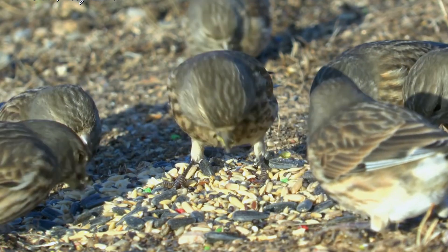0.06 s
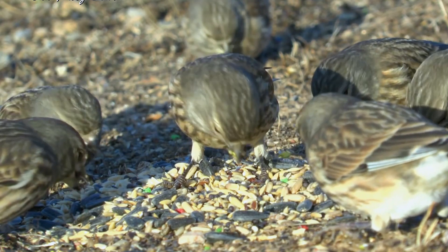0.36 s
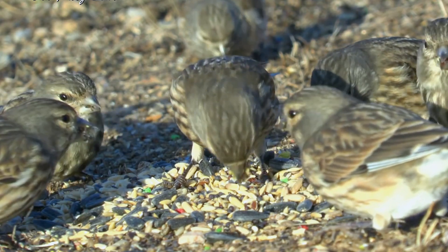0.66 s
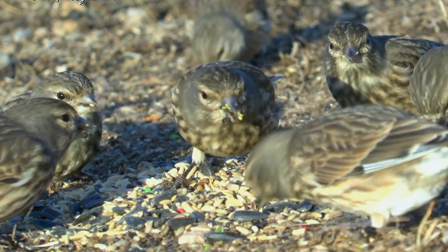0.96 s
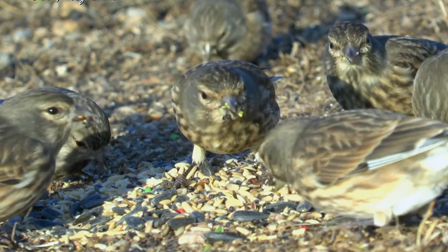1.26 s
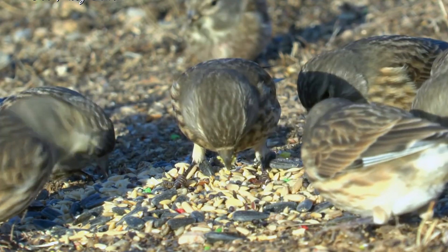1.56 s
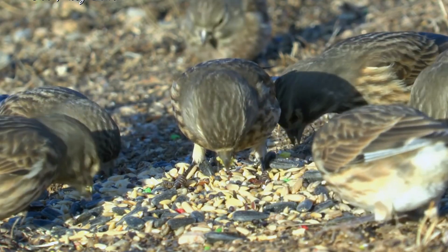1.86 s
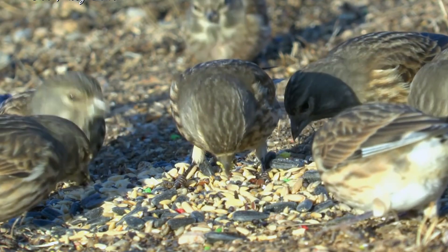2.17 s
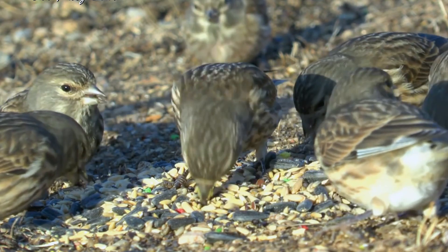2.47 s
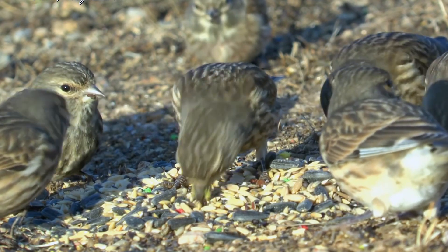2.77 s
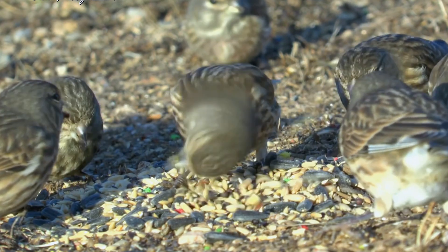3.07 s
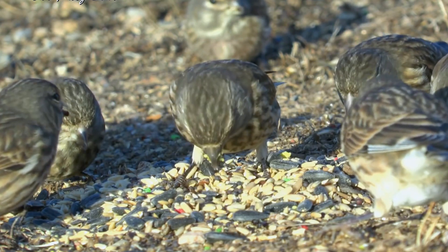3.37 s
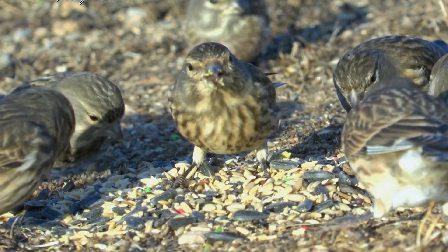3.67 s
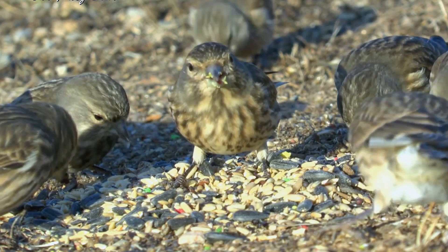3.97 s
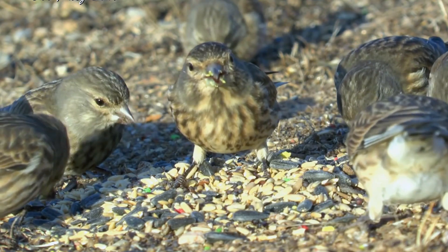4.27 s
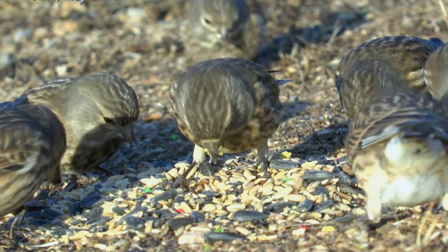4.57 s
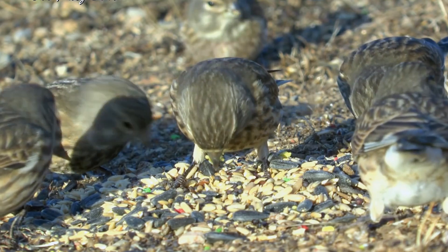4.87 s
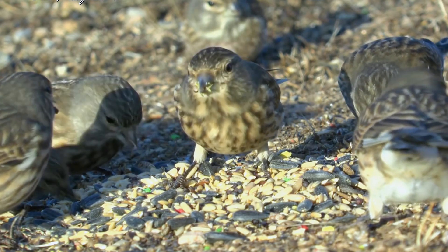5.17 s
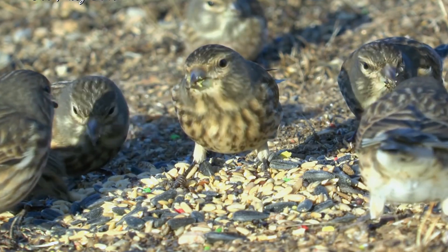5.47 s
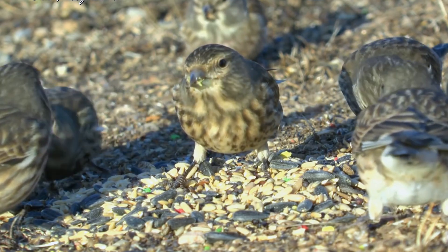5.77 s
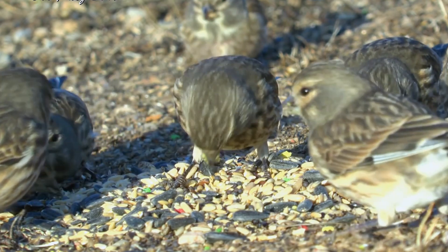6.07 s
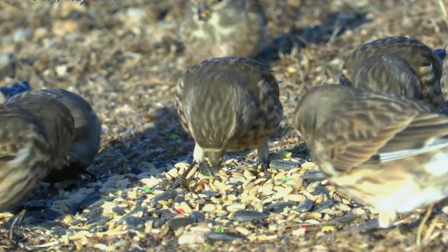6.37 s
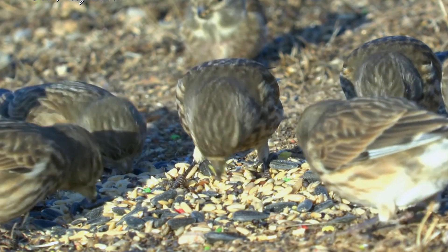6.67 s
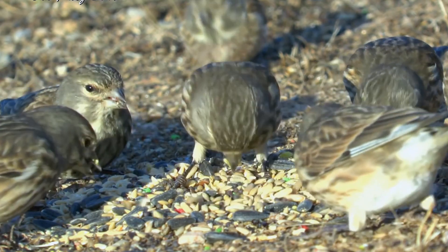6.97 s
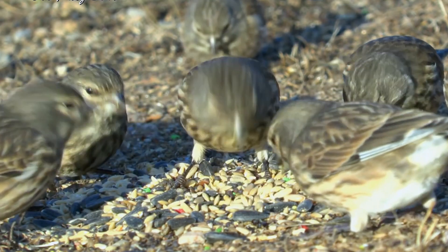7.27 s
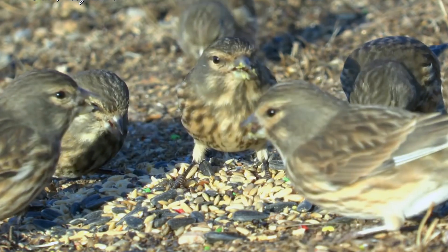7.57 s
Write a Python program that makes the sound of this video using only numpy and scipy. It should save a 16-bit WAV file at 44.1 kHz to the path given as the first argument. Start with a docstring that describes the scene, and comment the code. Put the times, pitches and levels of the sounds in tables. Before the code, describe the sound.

A flock of small finches feeds on seed close to the microphone outdoors. Sharp, falling chips come in quick groups, mixed with tiny pecking ticks, cracking husks and a few faint low bumps. Later the birds bicker in a run of hoarse, wavering calls that ends in one brief harsh squabble. Farther birds whistle thinly and give a buzzy chatter at the end, over a soft rush and faint hum.

```python
"""Over a low outdoor rush and a faint hum, husks crack and sharp chips fall in pitch: small finches feed
close by, then bicker in wavering calls and one harsh squabble. Each voice is a gliding tone of the syrinx,
roughened by membrane flutter and coloured by throat or beak; each husk is an impulse with one resonance.
Birds further off whistle and chatter, and a hard surface nearby throws back a quick echo."""
import sys
import numpy as np
from scipy import signal
from scipy.fft import rfft, irfft, next_fast_len
from scipy.io import wavfile
from scipy.ndimage import map_coordinates

SR = 44100
rng = np.random.default_rng(int(sys.argv[2]) if len(sys.argv) > 2 else 0)


def dump(signal):
    """Clip the signal to [-1, 1] and save it as 16-bit WAV at the path in sys.argv[1]."""
    limited = np.clip(np.atleast_2d(signal).T, -1, 1)
    pcm = np.round(limited * 32767).astype(np.int16)
    wavfile.write(sys.argv[1], SR, pcm)


N = 340011


def amp(db):
    """Decibels as an amplitude ratio."""
    return 10 ** (np.asarray(db) / 20)


def unit(x):
    """Normalisation to rms 1."""
    return x / np.sqrt(np.mean(x ** 2) + 1e-20)


def along(points, hz):
    """Interpolation of (frequency_hz, value) points on a logarithmic frequency axis."""
    f, v = np.transpose(points)
    return np.interp(np.log(hz + 1), np.log(f + 1), v)


def filtered(x, response):
    """Linear filtering: the spectrum is multiplied by a frequency response."""
    size = x.shape[-1]
    m = next_fast_len(size + 4096)
    return irfft(rfft(x, m) * response(np.fft.rfftfreq(m, 1 / SR)), m)[..., :size]


def noise(spectrum, size):
    """Spectral shaping of white noise, at rms 1."""
    return unit(filtered(rng.standard_normal(size), lambda hz: amp(along(spectrum, hz))))


def wobble(rate, size):
    """Random modulation: a smooth curve with rate knots a second."""
    return map_coordinates(rng.standard_normal(2048), [np.arange(size) * rate / SR], mode="wrap")


def phase_of(hz):
    """Phase is the time integral of frequency."""
    return 2 * np.pi * np.cumsum(hz) / SR


def progress(length_s):
    """Normalised time, 0 to 1 over a note."""
    return np.linspace(0, 1, max(int(length_s * SR), 8))


def add(track, start_s, sound):
    """Superposition of a sound on a track."""
    part = track[max(round(start_s * SR), 0):][:len(sound)]
    part += sound[:len(part)]


def background():
    """Low rush, thin hiss and a slightly unsteady hum, highly coherent between the ears."""
    # spectrum of the outdoor rush: frequency_hz, relative_density_db
    rush_spectrum = [(15, -62), (25, -22), (109, -8), (140, -6.5), (173, -1), (395, -8), (507, -14.5),
                     (541, -9), (578, -8.5), (649, -16), (717, -10), (846, -14), (1030, -38.5), (1080, -24),
                     (1300, -22), (1690, -57.5), (2860, -120)]
    # spectrum of the hiss: frequency_hz, relative_density_db
    hiss_spectrum = [(650, -32), (1100, -1.5), (1150, -17), (1380, -6), (1560, -6), (1810, -4),
                     (4530, -9.5), (7800, -11), (9900, -6), (15600, -9.5), (16100, -23.5)]
    # partials of the hum: frequency_hz, level_db
    partials = [(546.6, -66), (1093, -83), (1420, -80.5)]
    rush_gain = amp(-60.5 + 1.9 * wobble(4.3, N))
    rush = rush_gain * filtered(noise(rush_spectrum, N), lambda hz: hz / np.hypot(hz, 55))
    hiss = amp(-66.5) * noise(hiss_spectrum, N)
    hum = np.zeros(N)
    for hz, db in partials:
        peak = np.sqrt(2) * amp(db + wobble(4.7, N))
        hum += peak * np.sin(phase_of(hz * (1 + .0016 * wobble(5.5, N))))
    side = amp(-79.5) * noise(rush_spectrum, N) + amp(-99.5) * noise(hiss_spectrum, N)
    return rush + hiss + hum + np.array([side, -side])


def thumps():
    """Dull bumps under some loud notes: a smooth 30 ms pulse holds only low frequencies."""
    # bumps: centre_s, peak_db
    bumps = [(1.605, -46), (1.745, -52), (1.922, -45), (4.588, -54), (4.694, -63)]
    out, u = np.zeros(N), progress(.03)
    for centre_s, db in bumps:
        add(out, centre_s - len(u) / SR / 2, amp(db) * np.sin(np.pi * u) ** 4)
    return out


def yard(x, echo_db, tail_db, t60_s):
    """Comb filtering by one inverted reflection, stronger on the left, then a weak diffuse decay."""
    # grit and twigs scatter treble best: frequency_hz, gain_db
    scatter = [(2000, -3.5), (4000, -4), (8000, 3.5), (14000, 6)]
    delay_s, ear_gains = .0026, np.array([[1.4], [.6]])
    near = filtered(x, lambda hz: 1 - ear_gains * amp(echo_db) * np.exp(-2j * np.pi * hz * delay_s))
    t = np.arange(SR // 2) / SR
    tail = rng.standard_normal((2, len(t))) * amp(-60 * t / t60_s)
    tail = filtered(tail / np.linalg.norm(tail[0]), lambda hz: amp(along(scatter, hz)))
    mid, side = amp(tail_db) * signal.fftconvolve(x[None], tail, axes=1)[:, :N]
    return near + np.array([mid + side / 2, mid - side / 2])


def chatter(start_s=7.056, period_s=.0745, syllable_s=.033, count=9):
    """A far bird's buzzy run: nearly periodic bursts of band noise, growing a little louder."""
    out, u = np.zeros(N), progress(syllable_s)
    for k, db in enumerate(np.linspace(-66, -62, count)):
        syllable = np.sin(np.pi * u) * noise([(2500, -24), (3800, -11), (5200, -4), (6800, -27)], len(u))
        onset_s = start_s + k * period_s + rng.normal(0, .0061)
        add(out, onset_s, amp(db + rng.normal(0, .994)) * syllable)
    return out


def tremble(size, depth, rate_hz=125):
    """Frequency modulation: a quick, uneven shake, as a factor on pitch."""
    return 1 + depth * np.sin(phase_of(rate_hz * (1 + .2 * wobble(60, size))) + 2 * np.pi * rng.random())


def syrinx(hz, rasp, waver, jitter, shiver):
    """A wavering tone and its overtones; membrane flutter gives each sidebands, heard as rasp."""
    size = len(hz)
    shaken_hz = hz * tremble(size, shiver)
    phase = phase_of(shaken_hz * (1 + waver * wobble(260, size) + jitter * rasp * wobble(1500, size)))
    buzz = np.exp(-1j * phase_of(1000 + 300 * wobble(200, size)))  # an unsteady second oscillation
    shake = .43 * (wobble(2800, size) + 1j * wobble(2800, size)) + .35 * (buzz + buzz.conj() / 2)
    flutter = (1 + rasp * amp(2.8 * wobble(96, size)) * shake) / np.sqrt(1 + rasp ** 2)
    overtones = sum(amp(db) * np.exp(1j * k * phase) for k, db in enumerate([0, -4, -11], 2))
    return unit((flutter * np.exp(1j * phase)).imag), unit((flutter ** 2 * overtones).imag)


def whistles(overtone_db=-25):
    """Far, slightly hoarse glides, thin because nearly all their energy lies in the fundamental."""
    # slurred notes: start_s, length_s, start_hz, end_hz, level_db
    notes = [(1.38, .045, 3900, 4460, -58), (1.794, 0.0145, 3150, 3350, -50),
             (2.418, .045, 4270, 3844, -57), (3.09, .052, 3540, 4380, -39),
             (3.348, 0.057, 4280, 4400, -51.5), (3.482, 0.041, 5660, 5040, -51.5),
             (3.621, 0.056, 5500, 5040, -45.5), (4.754, 0.027, 3240, 3620, -49),
             (4.84, 0.13, 6010, 6170, -64), (6.059, 0.035, 3080, 3720, -47.5),
             (6.144, 0.028, 3860, 5100, -45), (6.255, 0.052, 2800, 3030, -43),
             (6.253, 0.024, 3320, 5030, -45), (6.271, 0.024, 4125, 5750, -42.5),
             (6.593, 0.026, 5470, 5130, -46.5)]
    out = np.zeros(N)
    for start_s, length_s, start_hz, end_hz, db in notes:
        u = progress(length_s)
        hz = end_hz + (start_hz - end_hz) * (1 - u) ** 2
        tone, overtones = syrinx(hz, rasp=.2, waver=.01, jitter=.02, shiver=0)
        add(out, start_s, amp(db) * np.sin(np.pi * u) * (tone + amp(overtone_db) * overtones))
    return out


def crack(db, pitch_hz, half_width_hz=1700, click_db=-19.5):
    """Impulse excitation: a snap and faint crumbling drive one broad resonance over a wideband click."""
    t = np.arange(-64, 1024) / SR
    decay = (t >= 0) * (amp(-60 * t / .002) + amp(-22 - 60 * t / .055))
    snap = decay * rng.standard_normal(len(t))
    resonance = lambda hz: 1 / (1 + ((hz - pitch_hz) / half_width_hz) ** 2)
    response = lambda hz: (resonance(hz) + amp(click_db)) * amp(along([(1100, -31.5), (2600, 0)], hz))
    return 22 * amp(db) * filtered(snap / np.linalg.norm(snap), response)


def husks(faintest_db=-68.5, spread_db=13.5, highest_hz=14000):
    """Fracture transients: husks snap in beaks among tiny random ticks of pecking, most of them high."""
    # cracking husks: start_s, level_db, pitch_hz
    snaps = [(.191, -41.5, 13800), (.697, -24.5, 11100), (1.416, -38, 2780), (1.529, -37, 8800),
             (1.569, -34.5, 15000), (1.687, -22.5, 15100), (1.909, -17.5, 13950), (2.003, -39.5, 15000),
             (2.127, -42, 12700), (2.448, -40.5, 13100), (2.823, -36, 13500), (.886, -48.5, 7170),
             (2.879, -35, 10900), (3.571, -42, 10600), (3.597, -36, 8900), (3.627, -39.5, 5000),
             (4.22, -39, 11000), (4.322, -29, 4000), (4.609, -37.5, 4860), (4.719, -31, 4960),
             (5.519, -28.5, 12500), (5.958, -34, 6000), (6.375, -38.5, 13000), (7.329, -43, 8500)]
    pecks = [(when * N / SR, faintest_db + spread_db * size ** 2, highest_hz * pitch ** .35)
             for when, size, pitch in rng.random((170, 3))]
    out = np.zeros(N)
    for start_s, db, pitch_hz in list(snaps) + pecks:
        add(out, start_s - 64 / SR, crack(db, pitch_hz))  # a crack has 64 samples of lead-in
    return out


def airy(voices, db, t60_s):
    """Amplitude-modulated noise: a soft hiss follows the power of each note and dies just after it."""
    fade = amp(-60 * np.arange(SR // 4) / SR / t60_s) ** 2
    power = np.abs(signal.fftconvolve(voices ** 2, fade / fade.sum())[:N])
    hiss = noise([(1200, -29), (1800, 7.5), (4500, 0), (7000, -3.5), (10000, -8.5), (15000, -3.5)], N)
    return amp(db) * np.sqrt(power) * hiss


def squabble(start_s=6.35, length_s=.2194, low_trim_db=1.5, high_trim_db=-2.5, harsh_db=6):
    """Biphonation: in a harsh threat, both sides of the syrinx sound at once on different pitches."""
    # course of the two voices: time_s, low_db, high_db, overtone_db, low_hz, high_hz
    course = [(6.36, -42, -39, -38.5, 2490, 3410), (6.388, -36.5, -28, -35, 2398, 3570),
              (6.432, -28, -36.5, -30, 2646, 3400), (6.457, -28, -26.5, -30, 2565, 3295),
              (6.503, -35.5, -28.5, -43.5, 2380, 3300), (6.522, -28.5, -34, -46, 2100, 3080),
              (6.539, -33, -23.5, -43, 2350, 3320), (6.56, -32, -41, -54, 2210, 3500)]
    t = start_s + length_s * progress(length_s)
    times, *columns = np.transpose(course)
    low_db, high_db, overtone_db, low_hz, high_hz = [np.interp(t, times, column) for column in columns]
    low, low_overtones = syrinx(low_hz, rasp=.3, waver=.04, jitter=.11, shiver=.025)
    high, high_overtones = syrinx(high_hz, rasp=.4, waver=.036, jitter=.05, shiver=.025)
    sway_db = 2 * wobble(88.7, len(t))  # one side gains as the other weakens
    voice = amp(low_trim_db + low_db + sway_db) * low + amp(high_trim_db + high_db - sway_db) * high
    voice += amp(harsh_db + overtone_db) * unit(high_overtones + .3 * low_overtones)
    out = np.zeros(N)
    add(out, start_s, voice * amp(1.3 * wobble(153.2, len(t))) * signal.windows.tukey(len(t), .1))
    return out


def flanks(u, peak):
    """Normalised distance before and after a note's turning point, each 0-1."""
    peak = np.clip(peak, .02, .95)
    return np.clip(1 - u / peak, 0, 1), np.clip((u - peak) / (1 - peak), 0, 1)


def arch(u, start_hz, crest_hz, end_hz, crest, sag):
    """Pitch contour: a glide to the crest, then a fall that comes earlier with more sag."""
    before, after = flanks(u, crest)
    fall = (1 - after ** 1.2) ** sag
    return end_hz + (crest_hz - end_hz) * fall + (start_hz - crest_hz) * before ** 1.7


def swell(u, loudest, rise_db, fall_db, bend):
    """Amplitude envelope: air pressure rises and falls through one note, with soft ends."""
    before, after = flanks(u, loudest)
    return amp(-rise_db * before ** bend - fall_db * after ** bend) * signal.windows.tukey(len(u), .14)


def calls(attack_s=.0023, full_voice_db=-15.5, overtone_growth=.58):
    """Arching notes that start hoarse and clear; harmonics grow nonlinearly, so louder is brighter."""
    # wavering calls: start_s, length_s, start_hz, crest_hz, end_hz, crest_fraction, loudest_fraction,
    # sag_exponent, level_db, rasp_depth, shiver_depth
    notes = [(3.307, 0.075, 4054, 3768, 2338, .3, 0.68, 1.1, -28.5, 0.63, 0.0069),
             (5.178, 0.073, 2067, 3590, 2970, .36, 0.64, 2.2, -34.5, 0.42, .025),
             (5.327, 0.068, 3054, 3630, 3003, 0.5, 0.84, 1.2, -40, 0.19, 0.014),
             (5.506, 0.084, 3740, 3905, 2358, 0.3, 0.49, 3.3, -18.5, 0.18, 0.016),
             (5.636, 0.087, 3550, 3530, 2934, .28, 0.45, 2.6, -21, 0.41, .01),
             (5.757, 0.085, 3350, 3588, 2973, .39, 0.62, 4.5, -18.5, 0.29, .035),
             (5.891, 0.092, 3480, 3618, 2527, .27, .72, 1.1, -17.5, 0.5, 0.017),
             (6.126, 0.066, 3083, 3446, 2870, 0.1, 0.54, 1.3, -37.5, 0.22, .03),
             (6.286, 0.079, 3123, 3620, 2650, .33, .5, 2.1, -15.5, .3, 0.017),
             (6.633, 0.097, 2095, 3390, 2667, 0.6, 0.9, 1.9, -27.5, 0.67, 0.047)]
    out = np.zeros(N)
    for start_s, length_s, start_hz, crest_hz, end_hz, crest, loudest, sag, db, rasp, shiver in notes:
        u = progress(length_s)
        hz = arch(u, start_hz, crest_hz, end_hz, crest, sag)
        tone, overtones = syrinx(hz, rasp * (1.5 - 1.2 * u), waver=.016, jitter=.04, shiver=shiver)
        push = swell(u, loudest, rise_db=15, fall_db=12.5, bend=1.15) * amp(wobble(150, len(u)))
        strain = swell(u, (crest + loudest) / 2, rise_db=24, fall_db=34, bend=1.9)
        overtone_db = -10 + overtone_growth * (db - full_voice_db)
        onset = 1 - np.exp(-u * length_s / attack_s)
        add(out, start_s, amp(db) * onset * (push * tone + amp(overtone_db) * strain * overtones))
    return out


def throat(source):
    """Source and filter: the throat's resonances colour the sound of the syrinx."""
    # response of the throat: frequency_hz, gain_db
    formants = [(1100, -22.5), (1600, -11.5), (2000, 3), (2500, 1.5), (3600, 2), (4600, -6), (7000, -1.5),
                (10000, -5), (15000, -15)]
    return filtered(source, lambda hz: amp(along(formants, hz)))


def chips(flick=.27, linger=1.4, attack_s=.0025, release_s=.006, rasp=.19, puff_s=.02, puff_db=-25.5):
    """Abrupt contact notes flick up and plunge; harmonics flare as they sweep the beak's resonance."""
    # close chips: top_s, rise_s, fall_s, after_top_s, top_hz, end_hz, level_db, octave_db, upper_db
    notes = [(0.43, 0.0086, 0.014, 0.028, 2935, 1200, -20, -6, -4),
             (0.516, 0.0082, 0.016, 0.032, 3000, 1195, -18, -7, 2),
             (.610, 0.0098, 0.017, 0.031, 3060, 1200, -19.5, -8, 2),
             (1.117, 0.0052, 0.0094, .021, 2837, 1860, -17, -17.5, -1),
             (1.593, 0.0025, 0.0075, 0.029, 2690, 1825, -17.5, -11, -15),
             (1.724, 0.0048, 0.014, 0.029, 3135, 1720, -14.5, -14.5, -16),
             (1.909, .005, 0.01, 0.028, 3020, 1750, -18, -5.5, -7),
             (2.72, 0.0053, 0.01, 0.023, 2796, 1699, -16.5, -8, -1),
             (2.853, 0.005, .0098, 0.026, 2730, 1666, -17.5, -3.5, -8),
             (4.419, 0.0068, 0.012, 0.021, 2785, 1638, -19.5, -3, -9),
             (4.576, 0.0058, 0.01, 0.027, 2770, 1707, -16.5, -1.5, -5.5),
             (4.688, 0.0068, 0.0094, 0.023, 2580, 1646, -14, -9, -0.5),
             (4.948, 0.0038, .0095, .021, 2944, 1918, -19.5, -15, -11.5)]
    # resonance that the fundamental falls through: frequency_hz, gain_db
    body = [(1350, -22), (1720, -15.5), (2050, -2.5), (2400, 1), (3050, -5.5)]
    # response of the beak to the upper harmonics: frequency_hz, gain_db
    beak = [(4000, -1.5), (6500, -14), (8000, -1.5), (10000, 7), (12000, -4), (16000, -15.5)]
    puff_spectrum = [(1400, -25.5), (2400, -1.5), (6000, -11), (15000, -21)]
    out = np.zeros(N)
    for top_s, rise_s, fall_s, after_top_s, top_hz, end_hz, db, octave_db, upper_db in notes:
        t = (rise_s + after_top_s) * progress(rise_s + after_top_s) - rise_s  # zero at the top pitch
        before = np.maximum(-t, 0) / rise_s
        plunge = np.exp(-(np.maximum(t, 0) / fall_s) ** linger)
        hz = end_hz + (top_hz - end_hz) * plunge - top_hz * flick * before ** 2
        phase = phase_of(hz * (1 + .006 * wobble(1400, len(t))))
        gate = np.clip((t + rise_s) / attack_s, 0, 1) * np.clip((after_top_s - t) / release_s, 0, 1)
        push = gate * amp(along(body, hz) - 10 * before + 1.5 * wobble(370, len(t)))
        upper = unit(sum(amp(along(beak, k * hz) - 2 * k) * np.sin(k * phase) * (k * hz < SR / 2)
                         for k in range(3, 10)))
        overtones = np.sqrt(2) * amp(octave_db) * np.sin(2 * phase) + amp(upper_db) * upper / 2
        build_up = np.clip((t + rise_s) / (rise_s + .0028), 0, 1) ** 1.1
        flutter = rasp * wobble(2400, len(t))
        tone = np.sqrt(2) * np.sin(phase) * (1 + flutter / 10)
        add(out, top_s - rise_s, amp(db) * push * (tone + overtones * (1 + flutter) * build_up))
        u = progress(puff_s)  # air scratches through the syrinx as the note starts
        puff = np.sin(np.pi * u) ** 4 * noise(puff_spectrum, len(u))
        add(out, top_s - rise_s - puff_s / 2, amp(db + puff_db) * puff)
    return out


def scene():
    """Near flock and far birds over the background; more reflected sound signals greater distance."""
    voices = chips() + throat(calls() + squabble())
    feeding = voices + airy(voices, db=-24.5, t60_s=.21) + husks()
    flock = yard(feeding, echo_db=-19, tail_db=-41, t60_s=.17)
    beyond = yard(whistles() + chatter(), echo_db=-9.5, tail_db=-15, t60_s=.34)
    return flock + beyond + thumps() + background()


def record(dry):
    """Band limiting: a steep low-pass removes the highest treble."""
    cutoff_hz = 16200
    return filtered(dry, lambda hz: 1 / np.sqrt(1 + (hz / cutoff_hz) ** 160))


dry = scene()
out = record(dry)
dump(out)
```